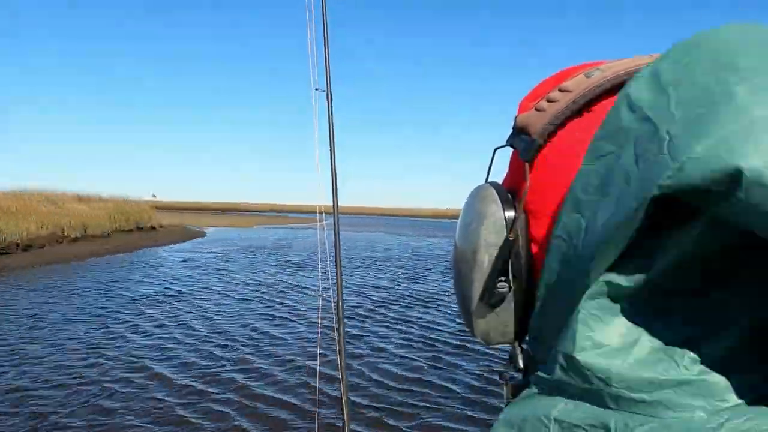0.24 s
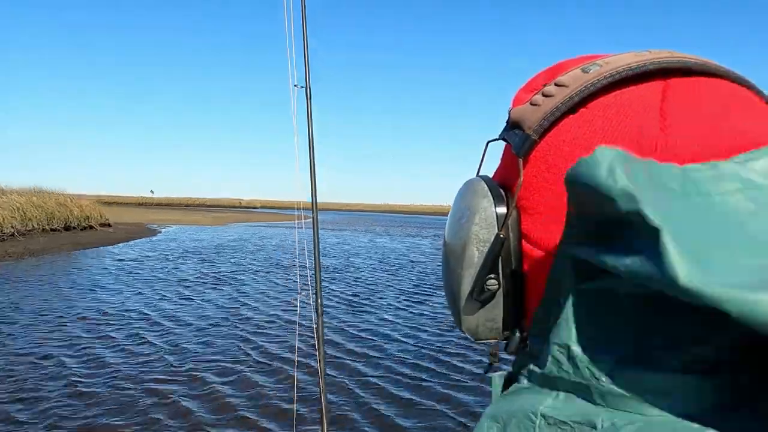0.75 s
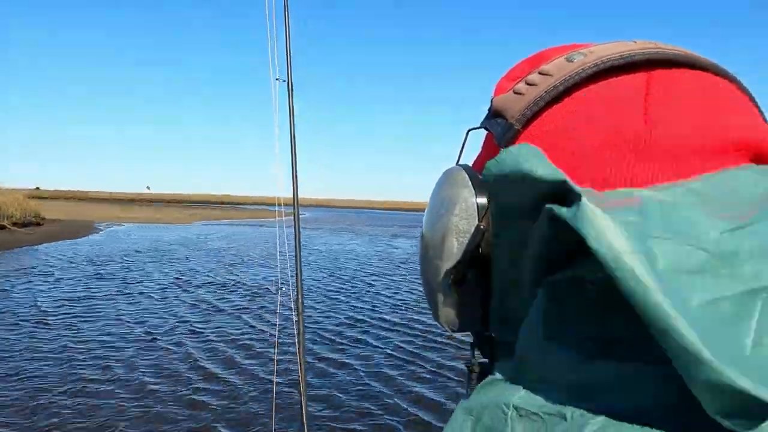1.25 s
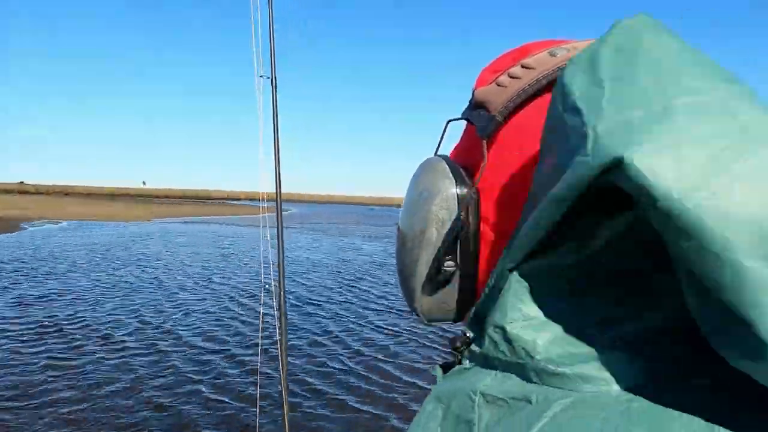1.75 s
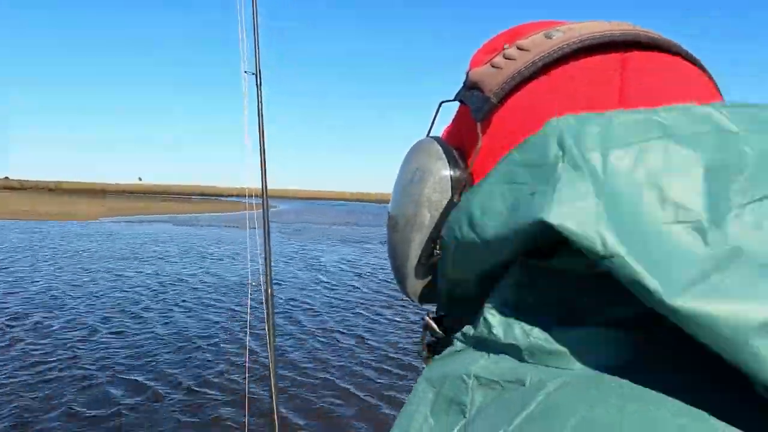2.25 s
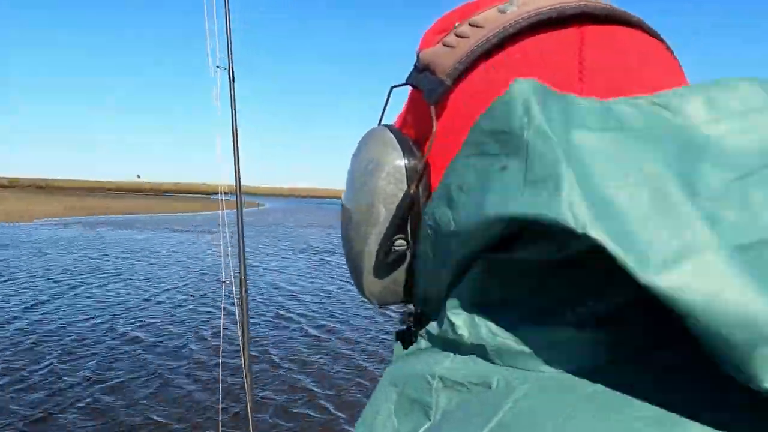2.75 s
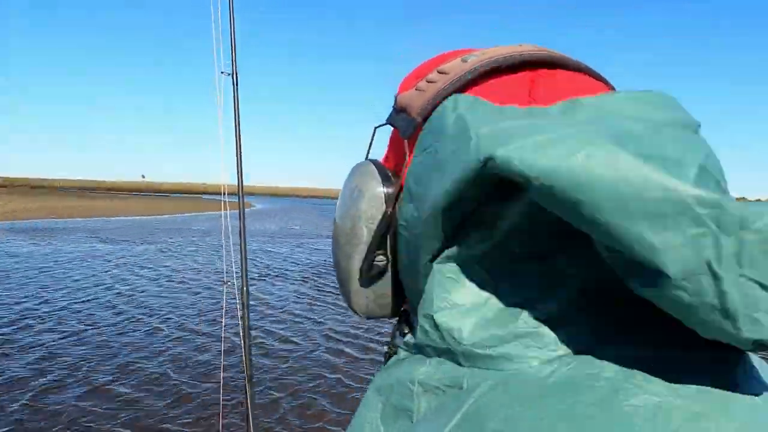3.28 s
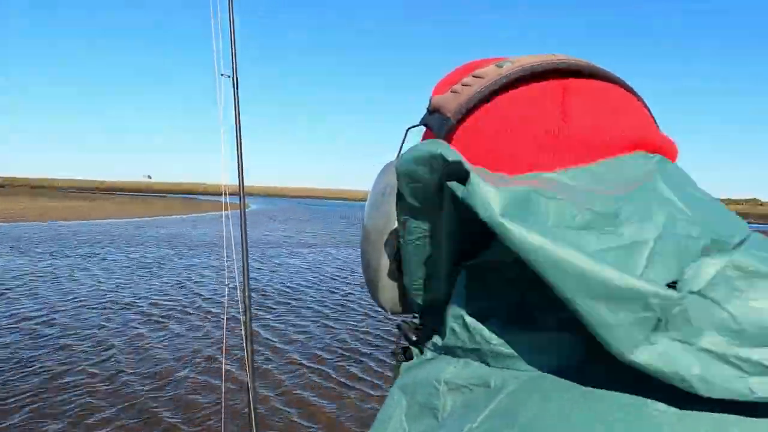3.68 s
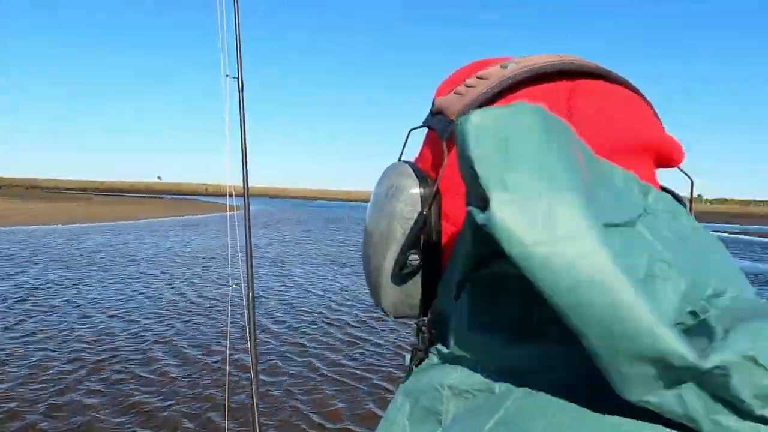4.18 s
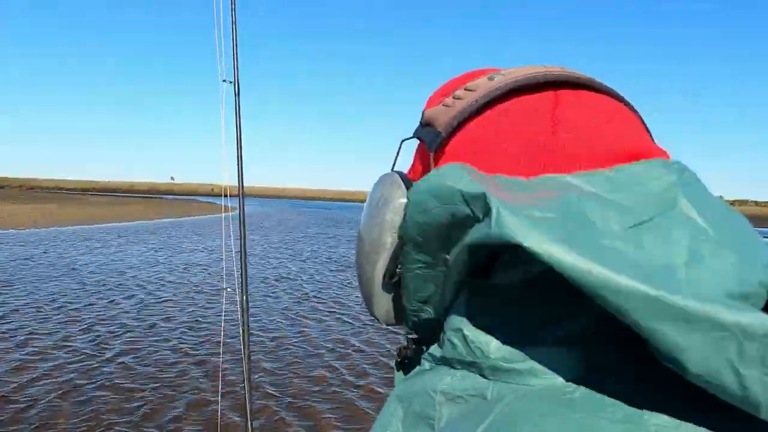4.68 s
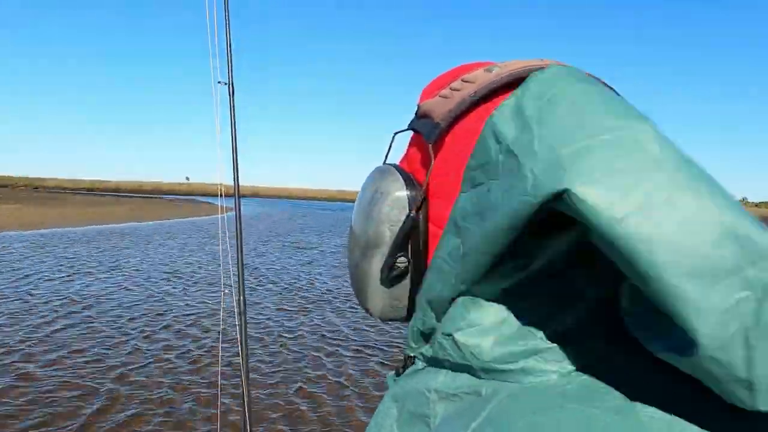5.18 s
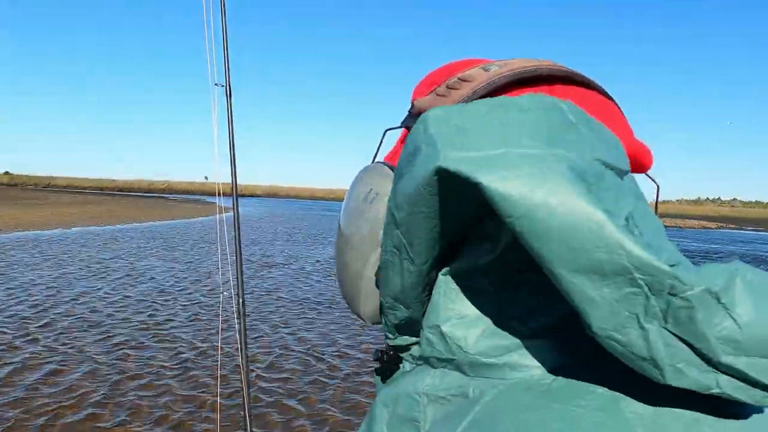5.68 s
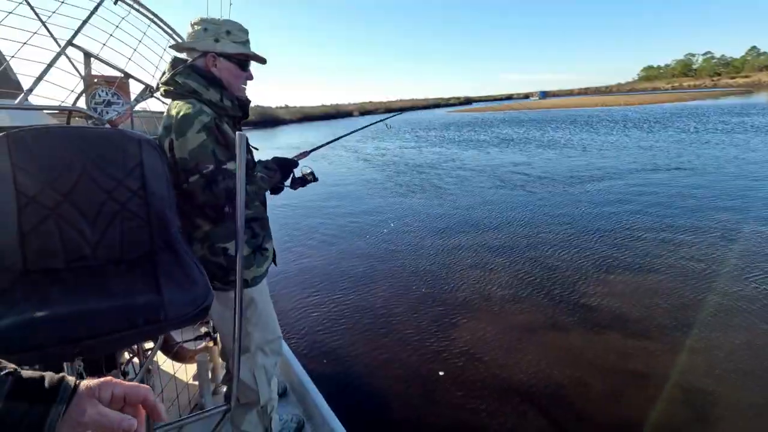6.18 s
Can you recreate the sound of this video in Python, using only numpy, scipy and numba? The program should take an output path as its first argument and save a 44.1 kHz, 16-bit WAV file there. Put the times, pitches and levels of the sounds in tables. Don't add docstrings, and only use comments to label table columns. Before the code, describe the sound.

Loud airboat engine and propeller drone with roaring, buffeting wind and flapping jacket, then an abrupt cut to near quiet with breeze bumps and reel ticks.

```python
import sys
import numpy as np
from scipy import signal
from scipy.fft import rfft, irfft
from scipy.io import wavfile
from scipy.ndimage import uniform_filter1d, minimum_filter1d
from numba import njit

SR = 44100
rng = np.random.default_rng(int(sys.argv[2]) if len(sys.argv) > 2 else 0)


def store_pcm(level_fs):
    pcm = np.round(np.clip(level_fs, -1, 1) * 32767).astype(np.int16)
    wavfile.write(sys.argv[1], SR, np.atleast_2d(pcm).T)


def convert_level_to_amplitude(level_db):
    exponent = np.asarray(level_db, float) / 20
    return 10 ** exponent


N = 283563
T = np.arange(N) / SR

# multiple_of_blade_rate, level_db
BLADE_TONES = [(1, -1), (2, -2.5), (3, 0.5), (4, -7), (5, -7.5), (6, -12), (7, -17), (8, -22.5), (9, -18),
               (10, -18), (11, -23), (12, -25.5), (13, -29.5), (14, -30), (15, -30.5), (16, -29.5)]
# multiple_of_four_stroke_cycle, level_db (against the firing tone)
EXHAUST_TONES = [(2, -14), (5, -10.5), (7, -14), (8, 1.5), (10, -11), (11, -27.5), (14, -25.5), (16, -21.5),
                 (17, -19.5), (24, -26)]
# time_s, blade_rate_hz
BLADE_SPEED = [(0, 86.6), (.35, 86.5), (.65, 85.7), (.95, 85.1), (1.25, 84.75), (1.75, 84.55),
               (2.15, 83.95), (2.5, 83.65), (3.0, 83.62), (3.35, 83.72), (4.4, 83.56), (5.15, 83.64),
               (5.9, 83.56)]
# time_s, tone_reach_db (to the seat), slipstream_db, blade_load_db
TURNS = [(0, 1, 2, -0.5), (.35, 3, 1.5, 3), (.62, 1, 4, 6.5), (.8, -2, 1.5, -4), (1.3, 0, -1.5, -3),
         (1.75, 1, -2.5, -4.5), (2.1, 1, -0.5, 3), (2.4, -2, 0.5, 3), (2.65, -4.5, -.5, -1.5),
         (3.0, -2.5, -3, -5), (3.3, -0.5, -2, -3), (3.7, 0.5, 0, 0), (4.05, 0.5, 0, 3), (4.4, 1.5, 1, -1.5),
         (4.8, -2, 0.5, -2), (5.2, 0.5, 2.5, -1), (5.55, 1, 3.5, 4), (5.9, 1.5, 4, 6)]
# pitch_hz, level_db (per Hz)
BUFFET_COLOUR = [(5, -17), (15, -7.5), (30, -3.5), (60, 1.5), (120, -2.5), (200, -1.5), (320, -9),
                 (600, -24.5), (1200, -44.5)]
# pitch_hz, level_db (per Hz)
ROAR_COLOUR = [(100, -12), (250, 2.5), (400, -0.5), (700, -4.5), (1100, -9), (1500, -16.5), (2000, -29),
               (3000, -39)]
# pitch_hz, level_db (per Hz)
RUSTLE_COLOUR = [(900, -2), (1800, 6.5), (2500, 1), (3300, 2), (4200, -2.5), (5200, -7.5), (7000, -19)]
# pitch_hz, level_db (per Hz)
SPRAY_COLOUR = [(3000, -2.5), (5000, -1.5), (7000, 2), (8200, -0.5), (10000, -7), (12000, -16),
                (13500, -25.5), (14800, -31), (15300, -51.5)]
# start_s, peak_db, spray_carried_db
WIND_GUSTS = [(0.339, -25, 3.5), (0.722, -12, 3), (0.936, -12, 0.5), (1.04, -14, -0.5), (1.138, -13.5, 2),
              (1.269, -17, 4.5), (1.376, -21, 4.5), (1.448, -18, 3), (1.529, -25, 0), (1.899, -18, 1),
              (2.02, -13, 2.5), (2.166, -20, 4), (2.209, -17, 2), (2.269, -26, -3.5), (2.413, -7, -0.5),
              (2.609, -20, 0.5), (2.949, -9, -0.5), (3.099, -22.5, 1), (3.269, -21, 4), (3.465, -26, 2),
              (3.652, -21, 2.5), (3.888, -18, -1), (4.033, -17, 2), (4.219, -10, 1.5), (4.339, -15, -3),
              (4.426, -16.5, 1), (4.499, -13, 1), (5.218, -9.5, -1), (5.469, -26, 0.5), (5.55, -13, 3)]
# start_s, peak_db, length_s
JACKET_FLAPS = [(0.743, -34, 0.0079), (0.845, -36, 0.0099), (0.955, -30, 0.012), (1.041, -35, 0.0072),
                (1.154, -28.5, 0.0083), (1.384, -40, 0.0077), (1.519, -42, 0.015), (2.06, -39, 0.016),
                (2.144, -34.5, 0.013), (2.445, -20.5, 0.0099), (2.535, -26, 0.0066), (2.623, -33, 0.0097),
                (2.753, -32, 0.0077), (2.854, -29, 0.0093), (2.967, -32, 0.011), (3.06, -31, 0.0067),
                (3.465, -42, 0.0058), (3.696, -35.5, 0.0089), (4.22, -38, 0.012), (4.334, -31, 0.0078),
                (4.75, -42, 0.011), (5.463, -33, 0.012)]
# start_s, depth_db
TREBLE_DIPS = [(.815, -2), (1.063, -5), (1.591, -3), (2.26, -2.5), (2.464, -2), (2.549, -4.5),
               (2.978, -3.5), (4.235, -3.5), (4.345, -2.5), (4.47, -3), (4.575, -2), (5.802, -4)]
# start_s, peak_db, ring_hz
BREEZE_PUFFS = [
    (5.958, -17.5, 117),
    (5.994, -13, 81),
    (6.024, -12, 125),
    (6.044, -10, 88.8),
    (6.064, -17.5, 151),
    (6.108, -18.5, 205),
    (6.183, -22, 103),
    (6.223, -22, 146),
]
# time_s, peak_db
BREEZE_FLUTTERS = [
    (5.993, -42),
    (5.935, -46),
    (6.029, -31),
    (6.06, -40),
    (6.112, -33),
    (6.14, -41),
]
# pitch_hz, level_db (per Hz)
THUMP_COLOUR = [(6, 1), (25, 5.5), (90, -0.5), (170, -7), (300, -35)]
# pitch_hz, level_db (per Hz)
FLUTTER_COLOUR = [(120, 1), (200, 5.5), (350, -8.0), (600, -18.5), (850, -38)]
# time_s, pitch_hz, level_db
REEL_CREAK = [
    (5.9, 735, -62),
    (5.93, 745, -57),
    (5.965, 770, -60),
    (5.985, 775, -85),
]
# start_s, peak_db
REEL_TICKS = [
    (6.165, -46),
    (6.18, -37),
    (6.184, -43),
    (6.191, -40),
]
# pitch_hz, level_db, fade_s (to fall 60 dB)
REEL_MODES = [
    (1670, 1, .03),
    (2800, -4, .02),
    (3720, -2, .015),
    (5160, -6, .012),
    (6600, -13, .01),
]
# pitch_hz, level_db (per Hz)
SCRAPE_COLOUR = [(1200, -6), (1700, 0), (3500, -4), (6000, -10), (8000, -23)]
# pitch_hz, level_db (per Hz)
SWISH_COLOUR = [(2300, -16), (2850, 7), (3400, -12), (5400, -20), (5900, -11), (6400, -17)]
# pitch_hz, level_db (per Hz)
WATER_COLOUR = [(410, -30), (700, -4), (920, -8), (1010, -9), (1860, -10), (3060, -14), (4170, -19),
                (5880, -23.5), (10900, -40), (12000, -38), (15600, -64), (22000, -120)]


def propeller(turn, reach_db, load_db):
    thrum_gain = convert_level_to_amplitude(-23.5 + load_db + 0.89 * walk(13))
    thrum = thrum_gain * tones([(1, 0)], turn, wobble_db=1.3, scatter=0.37, sweep=.35)
    blade_gain = convert_level_to_amplitude(-21.5 + 0.92 * reach_db + 0.25 * load_db + .8 * walk(11))
    blades = blade_gain * tones(BLADE_TONES[1:], turn, wobble_db=1.6, scatter=.45, sweep=.35)
    return thrum + blades


def engine(turn, reach_db):
    gain = convert_level_to_amplitude(-19 + reach_db + 1.4 * walk(9))
    exhaust = gain * tones(EXHAUST_TONES, turn / 3, wobble_db=1, scatter=0.4, sweep=.3)
    pump = tones([(1, -42)], 7.25 * turn, wobble_db=2.5, scatter=.5)
    return exhaust + pump


def headwind(turn, stream_db):
    buffet_db, rise_s, fall_s = -25.5, 0.029, 0.031
    blow = convert_level_to_amplitude(buffet_db) + sum(convert_level_to_amplitude(db - 7) * swell(s, rise_s, fall_s) for s, db, _ in WIND_GUSTS)
    blow_db = 20 * np.log10(blow) - buffet_db
    carried_db = sum(db * swell(s, rise_s, 1.1 * fall_s) for s, _, db in WIND_GUSTS)
    dip_db = sum(db / 2 * swell(s, .004, 0.045) for s, db in TREBLE_DIPS)
    eddy, gust = walk(16), walk(22)

    buffet = blow * convert_level_to_amplitude(1.2 * gust) * noise(BUFFET_COLOUR, 19, 72)

    chop = 1 + 0.15 * np.cos(turn - .6) + 0.058 * np.cos(2 * turn) + 0.092 * np.cos(turn / 3)
    roar_db = -26.5 + .9 * stream_db + 0.25 * blow_db + 0.35 * dip_db
    roar_db = roar_db + 0.33 * eddy + 1.05 * walk(40)
    roar = convert_level_to_amplitude(roar_db) * noise(ROAR_COLOUR, 510, 1700, chop)

    cracks = sum(convert_level_to_amplitude(db - 18.5) * np.exp(-((T - s - width / 3) / width) ** 2)
                 for s, db, width in JACKET_FLAPS)
    rustle_db = -46 + 0.99 * stream_db + 0.24 * blow_db + 0.55 * carried_db + 0.25 * eddy
    rustle_gain = convert_level_to_amplitude(rustle_db + 0.81 * gust + 0.88 * walk(120)) + cracks
    rustle = rustle_gain * noise(RUSTLE_COLOUR, 2050, 5500, 1 + 0.075 * np.cos(turn))

    spray_db = -56 + 1.2 * stream_db + carried_db + .4 * eddy
    spray_gain = convert_level_to_amplitude(spray_db + 0.39 * gust + 0.71 * walk(150)) + convert_level_to_amplitude(-23) * cracks
    spray = spray_gain * noise(SPRAY_COLOUR, 5980, 11000, 1 + 0.078 * np.cos(turn))
    return roar + buffet + convert_level_to_amplitude(dip_db) * (rustle + spray)


def ride():
    blade_hz, = curves(BLADE_SPEED)
    reach_db, stream_db, load_db = curves(TURNS)
    turn = 2 * np.pi * np.cumsum(blade_hz) / SR
    mix = propeller(turn, reach_db, load_db) + engine(turn, reach_db) + headwind(turn, stream_db)
    mix = convert_level_to_amplitude(1.0) * mix
    ahead = -minimum_filter1d(-np.abs(mix), size=260)
    limited = limit(mix, ahead, top=0.46, slope=0.64, attack=0.028, release=0.00085)
    return limited * np.minimum(T / 0.0018, 1)


@njit
def limit(x, ahead, top, slope, attack, release):
    y, envelope = np.empty(len(x)), top
    for i in range(len(x)):
        speed = attack if ahead[i] > envelope else release
        envelope += (ahead[i] - envelope) * speed
        y[i] = x[i] * min(1., top / envelope) ** slope
    return y


def breeze():
    peak_s, rise_db_s, fall_db_s = 6.01, 46, 39.5
    thump_db = -25.5 + np.minimum(rise_db_s * (T - peak_s), fall_db_s * (peak_s - T))
    thump = convert_level_to_amplitude(thump_db + 1.3 * walk(28)) * noise(THUMP_COLOUR, 13, 160)
    length_s = 0.016
    flutter_gain = convert_level_to_amplitude(-52) + sum(convert_level_to_amplitude(db) * swell(s - length_s / 2, length_s / 2, length_s)
                                  for s, db in BREEZE_FLUTTERS)
    flutter = flutter_gain * convert_level_to_amplitude(1.5 * walk(45)) * noise(FLUTTER_COLOUR, 250, 800)
    puffs = sum(convert_level_to_amplitude(db) * ring(hz, 0.065, s, rise=0.0017) for s, db, hz in BREEZE_PUFFS)
    return thump + flutter + puffs


def reel():
    ticks = sum(convert_level_to_amplitude(db + mode_db - 8) * ring(hz * rng.uniform(.94, 0.97), t60, s, rise=.0002)
                for s, db in REEL_TICKS for hz, mode_db, t60 in REEL_MODES)
    scrape_gain = sum(convert_level_to_amplitude(db - 7.5) * ring(90., 0.033, s) for s, db in REEL_TICKS)
    scrape = scrape_gain * noise(SCRAPE_COLOUR, 1200, 7000)
    creak_hz, creak_db = curves(REEL_CREAK)
    creak_turn = 2 * np.pi * np.cumsum(creak_hz) / SR
    creak = convert_level_to_amplitude(creak_db) * tones([(1, 0), (2, -3), (3, -12)], creak_turn, wobble_db=1.5, scatter=.7)
    return ticks + scrape + creak * (T < REEL_CREAK[-1][0])


def water_and_line():
    lull_s, lull_db, lull_width_s, near_s = 6.28, -5, .06, 6.37
    lull = np.exp(-((T - lull_s) / lull_width_s) ** 2)
    hiss_db = -58.5 + lull_db * lull + 139 * np.maximum(T - near_s, 0)
    hiss = convert_level_to_amplitude(hiss_db + 1.4 * walk(60)) * noise(WATER_COLOUR, 1000, 7000)
    swish_db = -72 + 2 * lull_db * lull + np.clip(250 * (T - near_s + .02), 0, 11)
    swish = convert_level_to_amplitude(swish_db + 2.5 * walk(90)) * noise(SWISH_COLOUR, 1000, 7000)
    return hiss + swish


def rest():
    return breeze() + reel() + water_and_line()


def tones(orders, turn, wobble_db, scatter, sweep=0.):
    total = 0
    for k, db in orders:
        gain = np.sqrt(2) * convert_level_to_amplitude(db + wobble_db * (0.56 * walk(7) + walk(30)))
        drift = scatter * (walk(5) + 0.65 * walk(24))
        total = total + gain * np.cos(round(k) * turn + drift + sweep * k * k)
    return total


def ring(hz, t60, start, rise=.0005):
    t = np.maximum(T - start, 0)
    fade = np.exp(-np.log(1000) * t / t60)
    return np.sin(2 * np.pi * hz * t) * fade * (1 - np.exp(-t / rise))


def swell(start, rise, fall):
    t = np.maximum(T - start, 0)
    return 2 * (1 - np.exp(-t / rise)) * np.exp(-t / fall)


def walk(rate):
    k = int(SR / rate)
    x = np.repeat(rng.standard_normal(N // k + 1), k)[:N]
    x = uniform_filter1d(uniform_filter1d(x, k), k)
    return x / np.std(x)


def curves(table):
    s, *columns = np.transpose(table)
    return [np.interp(T, s, c) for c in columns]


def noise(points, lo_hz, hi_hz, gate=1):
    x = colour(rng.standard_normal(N) * gate, points)
    return x / band(x, lo_hz, hi_hz)


def colour(x, points):
    hz, db = np.transpose(points)
    f = np.log(np.arange(N // 2 + 1) * SR / N + 1)
    beyond = np.maximum(np.log(hz[0]) - f, 0) + np.maximum(f - np.log(hz[-1]), 0)
    return irfft(rfft(x) * convert_level_to_amplitude(np.interp(f, np.log(hz), db) - 26 * beyond), N)


def band(x, lo_hz, hi_hz):
    sos = signal.butter(N=4, Wn=[lo_hz, hi_hz], btype="band", fs=SR, output="sos")
    return np.std(signal.sosfilt(sos, x))


def scene():
    change_s, trough = 5.89732, -.37
    under_way, still, cut = ride(), rest(), int(change_s * SR)
    before = np.minimum(T - T[cut], 0)
    under_way = under_way + (trough - under_way[cut]) * np.exp(before / .0015)
    still = still - still[cut] * np.exp(-np.abs(T - T[cut]) / 0.0045)
    return np.where(T <= T[cut], under_way, still)[None, :]


def top_cut(x):
    return signal.sosfilt(signal.butter(12, 15730, fs=SR, output="sos"), x)


def record(dry):
    return top_cut(dry)


dry = scene()
out = record(dry)
store_pcm(out)
```